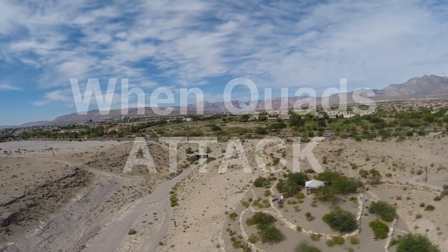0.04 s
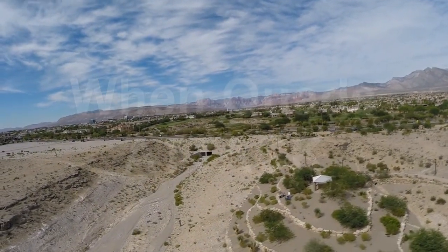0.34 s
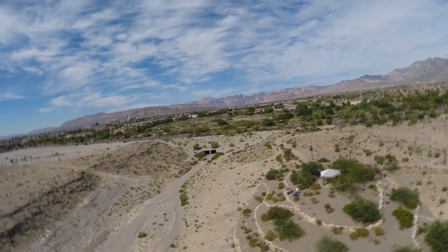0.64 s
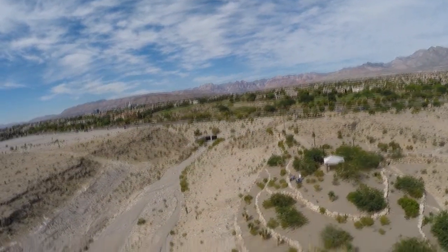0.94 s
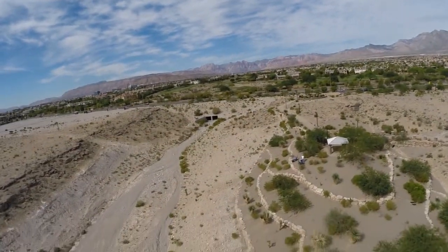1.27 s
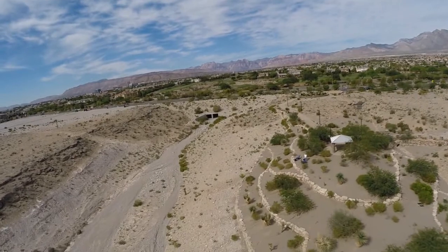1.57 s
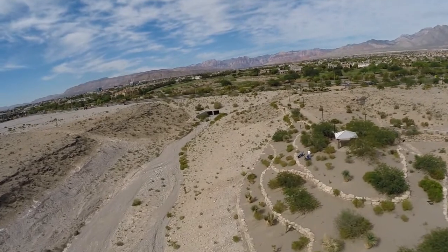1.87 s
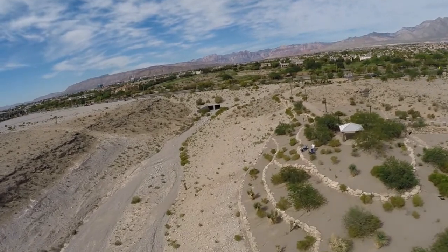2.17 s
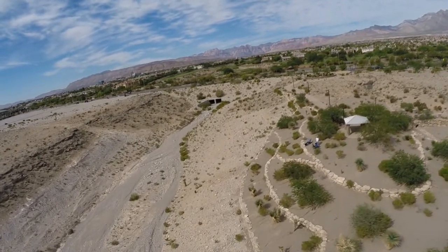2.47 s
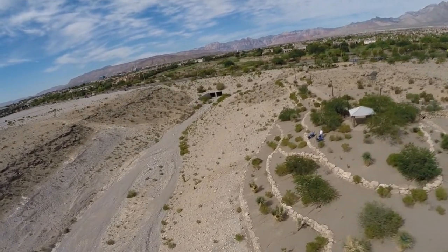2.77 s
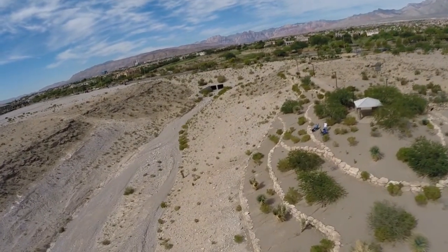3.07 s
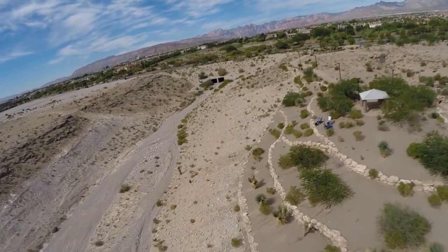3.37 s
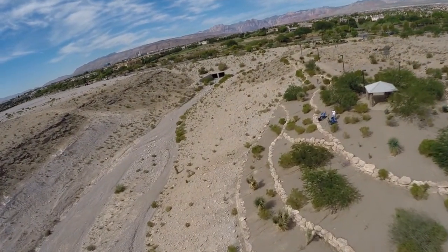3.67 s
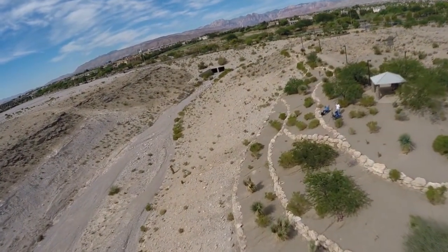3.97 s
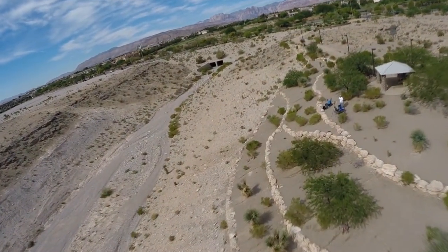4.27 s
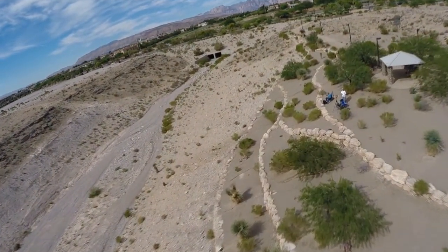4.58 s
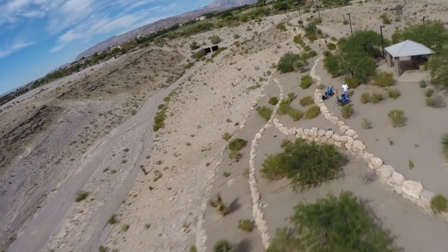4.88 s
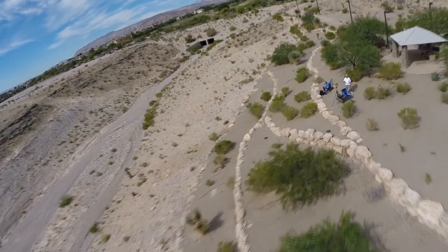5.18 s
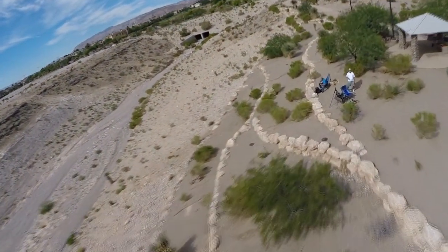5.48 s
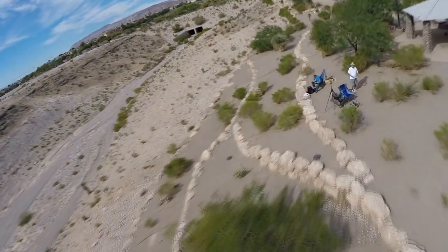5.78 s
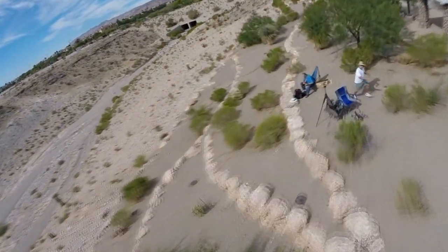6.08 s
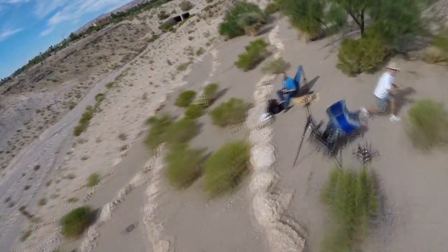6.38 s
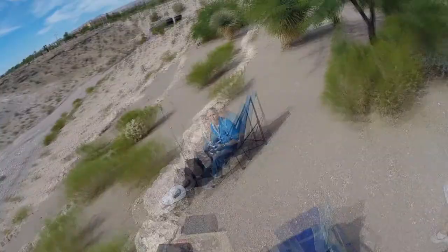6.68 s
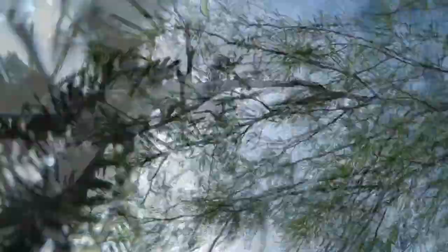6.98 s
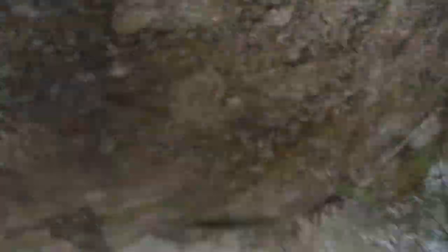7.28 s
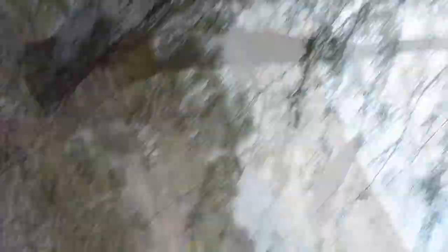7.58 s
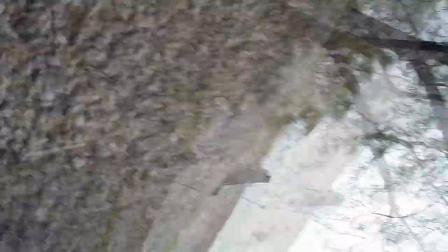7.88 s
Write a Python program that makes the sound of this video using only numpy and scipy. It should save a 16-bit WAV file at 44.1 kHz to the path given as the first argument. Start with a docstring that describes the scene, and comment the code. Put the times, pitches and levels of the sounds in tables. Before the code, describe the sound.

Throbbing propeller buzz and wind on the microphone grow louder, until the quadcopter hits branches, stalls and clatters over gritty ground.

```python
"""A throbbing propeller buzz in gusty wind: a small quadcopter, heard from its own camera, flies low
over a desert wash. It dives, revs up, clips a bush and stalls, then bounces and tumbles on gravel.
Each passing blade sends out a pressure pulse, and rotors at slightly different speeds beat together.
Turbulence adds swish and hiss, the motors whine, and wind buffets the microphone. In the crash,
impacts excite the damped modes of the plastic frame and camera case, and friction rattles the grit."""
import sys
import numpy as np
from scipy import signal
from scipy.fft import rfft, irfft
from scipy.io import wavfile

SR = 44100
rng = np.random.default_rng(int(sys.argv[2]) if len(sys.argv) > 2 else 0)


def unload_wav(signal):
    """Save mono or channel-first audio to the path in sys.argv[1] as 16-bit WAV at rate SR, clipped to [-1, 1]."""
    wavfile.write(
        sys.argv[1],
        SR,
        np.round(np.clip(np.atleast_2d(signal).T, -1, 1) * 32767).astype(np.int16),
    )


N = 350154
TIME = np.arange(N) / SR
STRIKE_S, POWER_OFF_S, GROUND_S = 7.015, 7.165, 7.278  # a branch is hit, motors are cut, the frame lands

# Airspeed, from 0 (cruising) to 1 (fastest), rising until the bush stops it: time_s, dive_fraction
AIRSPEED = [(0, 0.11), (2.8, 0.2), (3.6, 0.34), (4.5, 0.44), (5.6, 0.66), (6.75, 0.91), (6.92, 0.87),
            (7.05, 0)]
# Level laws of the close rotors: cruise_db, dive_db, octave_db, strike_db, off_db, ground_db
NEAR_LEVEL = (-17.5, 0.5, 5, -6, -1, -28)
SECOND_LEVEL = (-20.5, 1.5, -0.5, -24, -11, -30)
# Level law of the motor whine: same columns
WHINE_LEVEL = (-59, 6, 11, -9, -23, -20)

def propellers(far_db=-18, shell_hz=1085, shell_width_hz=99, dip_s=6.946):
    """Beating: two close rotors throb at their difference frequency; two far ones wander around them."""
    near_hz, second_hz = rotor_speeds()
    near_db, second_db = level(NEAR_LEVEL, near_hz), level(SECOND_LEVEL, second_hz)
    whine_db = level(WHINE_LEVEL, second_hz)
    dive, = follow(AIRSPEED)
    wobble_db = -38 + 29.5 * dive  # shaft imbalance, relative to the blade tone
    near_cycles, second_cycles = np.cumsum(near_hz) / SR, np.cumsum(second_hz) / SR + .5
    out = rotor(near_cycles, near_db, wobble_db, dull_db=-1)
    out += rotor(second_cycles, second_db, wobble_db, dull_db=3.5)
    shell = signal.iirpeak(shell_hz, shell_hz / shell_width_hz, fs=SR)
    out += gain_of(1) * dive * signal.lfilter(*shell, out)  # the frame resonates as the dive shakes it
    out += whine(second_hz, whine_db) + whine(near_hz, whine_db - 3)
    out += turbulence(near_cycles, second_cycles, near_hz)
    for hz in (near_hz, second_hz):
        far_hz = hz * (1.005 + .018 * drift(2))
        out += rotor(np.cumsum(far_hz) / SR, second_db + far_db, wobble_db, dull_db=-2.5)
        out += whine(far_hz, whine_db - 7)
    return out * gain_of(-12 * swell(dip_s, half_s=0.007))  # a brief dip on entering the bush

# The near rotor in flight: time_s, blade_rate_hz
FLIGHT_RATE = [(0, 194.4), (.5, 200.1), (.74, 199), (.84, 202.5), (.96, 197.1), (1.22, 201.7), (1.5, 198.1),
               (2.0, 196.1), (2.5, 198.5), (3.4, 203.8), (4.3, 206.9), (4.55, 209), (6.1, 209.1),
               (6.56, 211.8)]
# It pulls up, is slowed by twigs, races free, runs down and twitches once more: time_s, blade_rate_hz
CRASH_RATE = [(6.72, 221.6), (6.891, 272.8), (6.925, 261.6), (6.96, 225.4), (7.056, 198.2), (7.1, 293.4),
              (7.124, 303), (7.25, 201.5), (7.45, 145.5), (7.591, 197), (7.701, 160.4)]
# How far the second rotor's blade rate exceeds the near one's: time_s, beat_hz
BEAT_RATE = [(0, 19.6), (.88, 8.9), (1.0, 13.3), (1.45, 17.1), (1.74, 17.2), (2.87, 12), (3.66, 6.8),
             (4.25, .6), (4.6, 4.4), (4.85, 3.7), (5.03, 6), (5.49, 5.3), (5.68, 8.9), (6.04, 5.4),
             (6.7, 12.6), (6.76, 2), (6.86, 1.5), (6.935, 27), (7.0, 2)]

def rotor_speeds(trim_hz=0.597, stall_decay_s=0.36):
    """Blade-pass frequencies: the second rotor leads until the branch stalls it into exponential decay."""
    trim = trim_hz * drift(4.8)  # nudges from the flight controller
    near_hz = follow(FLIGHT_RATE + CRASH_RATE)[0] + trim
    beat_hz, = follow(BEAT_RATE)
    driven_hz = np.interp(np.minimum(TIME, STRIKE_S), TIME, near_hz + beat_hz)
    return near_hz, driven_hz * np.exp(-np.maximum(TIME - STRIKE_S, 0) / stall_decay_s)

def rotor(cycles, level_db, wobble_db, dull_db, lean_dull_db=3.5):
    """Rotational noise of two blades: their imbalance adds lines at 1 and 3 times the shaft rate."""
    dive, = follow(AIRSPEED)
    jittered = cycles + (0.0047 + 0.0072 * dive) * drift(42)
    upright = blade_pulses(jittered, dull_db)
    leaning = blade_pulses(jittered, dull_db + lean_dull_db)  # the dive turns the blades off axis
    pulses = (1 - dive) * upright + dive * leaning
    shaft = gain_of(wobble_db) * (np.cos(np.pi * cycles) + gain_of(-18) * np.cos(3 * np.pi * cycles))
    flutter_db = (.5 + 0.72 * dive) * drift(37)
    return gain_of(level_db + flutter_db) * (pulses + shaft)

# Spectrum of a passing blade's pressure pulse: harmonic_number, level_db
BLADE_HARMONICS = [(1, 0), (2, -5), (3, -12), (4, -18), (5, -23.5), (6, -27.5), (8, -36), (12, -46),
                   (20, -48)]

def blade_pulses(cycles, dull_db, count=20):
    """Fourier series of one pulse per blade; directivity takes off dull_db per octave."""
    cycle = np.linspace(0, 1, 1024)
    pulse = sum(gain_of(read(BLADE_HARMONICS, k) - dull_db * np.log2(k)) * np.cos(2 * np.pi * k * cycle)
                for k in range(1, count + 1))
    return np.sqrt(2) * np.interp(cycles % 1, cycle, pulse)

def level(law, hz, cruise_hz=205):
    """Level law in dB: linear in airspeed and log rotor speed, falling at each stage of the crash."""
    cruise_db, dive_db, octave_db, strike_db, off_db, ground_db = law
    dive, = follow(AIRSPEED)
    crash_db = strike_db * after(STRIKE_S, ramp_s=0.016)
    crash_db += off_db * after(POWER_OFF_S, ramp_s=0.022)
    crash_db += ground_db * after(GROUND_S, ramp_s=0.074)
    return cruise_db + dive_db * dive + octave_db * np.log2(hz / cruise_hz) + crash_db

# Spectra of the blades' turbulent noise: frequency_hz, relative_density_db
SWISH_SPECTRUM = [(150, -17), (260, -5), (500, -2.5), (800, 0), (950, -1.5), (1070, 4.5), (1220, -9),
                  (1800, -8.5), (2800, -13.5), (5000, -31), (9000, -33)]
HISS_SPECTRUM = [(1200, -0.5), (2800, -3.5), (4300, 2), (5500, -2), (6200, 0.5), (7000, -5), (9000, -9.5),
                 (11000, -11.5), (13300, -9.5), (15300, -23), (16000, -30)]
# Their level laws: cruise_db, dive_db, octave_db, strike_db, off_db, ground_db
SWISH_LEVEL = (-34, 1.5, 6, -15, -7, -25)
HISS_LEVEL = (-41.5, 2.5, 9, -0.5, -17, -25)

def turbulence(near_cycles, second_cycles, hz):
    """Noise modulated at the blade rate: broad puffs of swish, short spits of hiss that rasp with speed."""
    dive, = follow(AIRSPEED)
    gust_db = sum(db * swell(s, half_s) for s, half_s, _, db in AIR_GUSTS)
    swish_gate = .5 + puffs(near_cycles, sharpness=2.1) + .5 * puffs(second_cycles, sharpness=0.81)
    spits = puffs(second_cycles, sharpness=11, uneven_db=1.5) + 0.11 * puffs(near_cycles, sharpness=14)
    hiss_gate = 1 + (0.93 + 4.8 * dive) * spits
    swish = coloured(swish_gate * rng.standard_normal(N), SWISH_SPECTRUM)
    swish *= gain_of(level(SWISH_LEVEL, hz) + gust_db + 0.51 * drift(20))
    hiss = coloured(hiss_gate * rng.standard_normal(N), HISS_SPECTRUM)
    hiss *= gain_of(level(HISS_LEVEL, hz) + 0.55 * drift(23))
    return swish + hiss

def puffs(cycles, sharpness, uneven_db=4.0):
    """Envelope of the turbulent wake behind each blade, no two equally strong."""
    return np.exp(sharpness * (np.cos(2 * np.pi * cycles) - 1)) * gain_of(uneven_db * drift(115))

# How the arms transmit motor vibration: frequency_hz, gain_db
ARM_RESPONSE = [(4500, -12), (5900, -3), (6100, 1), (6300, 10), (6550, 8), (7000, -10), (8400, -4),
                (9000, 0), (9300, -7), (12000, -18)]

def whine(hz, level_db, orders=(28, 42), flutter_db=2.5):
    """Forced vibration: magnet poles passing the coils sing, and squeal at the resonances of the arm."""
    cycles = np.cumsum(hz) / SR + .002 * drift(90) + .02 * drift(9)
    tones = np.zeros(N)
    for k in orders:
        tone_db = read(ARM_RESPONSE, k * hz) + flutter_db * drift(8.3)
        tones += gain_of(tone_db) * np.cos(2 * np.pi * k * cycles)
    return gain_of(level_db) * tones

# Blows on the frame, stiffer parts ringing higher: start_s, knock_db, crack_db, pitch_ratio
IMPACTS = [(7.0165, -7, -9.5, 1.27), (7.021, -2, -16, 0.97), (7.0197, -5.5, -20, 1.15),
           (7.0229, -6, -15, 1.05), (7.0413, -17, -33, 1.4), (7.2827, -16, -9, 1.3), (7.291, -9, -17, 0.8),
           (7.3063, -5, -12, 1.83), (7.3107, -13, -29, 1.85), (7.314, -15, -29, 1.8),
           (7.349, -17, -34, 0.77), (7.354, -6.5, -17, 1.6), (7.36, -10, -19, 1.2), (7.393, -23, -25, 1),
           (7.4053, -24, -10, 1.5), (7.4185, -25, -16, 1.1), (7.457, -13, -35, 1.09),
           (7.559, -40, -29, 1.2), (7.7377, -3, -20, 1.02), (7.749, -8, -20, 1.01), (7.756, -14, -38, 1.24),
           (7.765, -19, -37, 1.2), (7.781, -2, -17, 1.08), (7.8186, -11, -18, 2.53),
           (7.837, -18.5, -29, 0.87), (7.866, -15.5, -18, 2.5), (7.9148, -21, -6.5, 1.7),
           (7.92, -4, -6, 1.26), (7.9248, -5.5, -19, .95), (7.935, -17, -11, 1.4)]
# Modes of the frame and camera case at pitch ratio 1: pitch_hz, relative_level_db, t60_s
FRAME_MODES = [(974, 0.5, 0.014), (1473, -2.5, 0.015), (1720, 4, 0.0062), (2250, -0.5, 0.0066),
               (2760, -9.5, 0.018), (3320, -8.5, 0.013), (4600, -12, 0.015), (5530, -12, 0.021),
               (6100, -16, 0.024), (7200, -17, .014), (9050, -26, .014)]

def knocks(crack_t60_s=0.012, hardness=0.29, contact_s=0.00016, stiffness_db=11):
    """Modal ringing: each blow cracks and rings the frame; harder contacts favour the higher modes."""
    out, t = np.zeros(N), np.arange(SR // 10) / SR
    hz, db, t60 = np.transpose(FRAME_MODES)[:, :, None]
    treble = signal.butter(2, 2800, "high", fs=SR, output="sos")
    for s, knock_db, crack_db, pitch in IMPACTS:
        scatter_db, detune, phase = rng.standard_normal((3, len(FRAME_MODES), 1))
        tilt_db = hardness * (crack_db - knock_db + 7.5) * np.log2(hz / hz[0])
        tilt_db -= stiffness_db * np.log2(pitch) * abs(np.log2(hz / hz[1]))  # stiff parts favour one note
        modes = np.sin(2 * np.pi * (hz * pitch * (1 + 0.0051 * detune) * t + phase))
        decay_db = 60 * t * np.sqrt(pitch) / t60
        ring = (gain_of(db + tilt_db + scatter_db - decay_db) * modes).sum(0)
        ring *= 1 - np.exp(-t / contact_s)  # the plastic yields before it rings
        crack = signal.sosfilt(treble, rng.standard_normal(len(t))) * gain_of(-60 * t / crack_t60_s)
        add(out, s, gain_of(knock_db) * ring / abs(ring).max() + gain_of(crack_db - 3.5) * crack)
    return out

# Dull thumps of the whole body: start_s, level_db, pitch_hz
BODY_JOLTS = [(7.096, -8.5, 39.8), (7.159, -11, 130), (7.293, -9, 56), (7.306, -12, 72.7),
              (7.348, -12.5, 110), (7.455, -15.5, 71.5), (7.534, -16, 65.8), (7.692, -11, 170),
              (7.713, -6.5, 131), (7.727, -8, 150), (7.753, -9, 110), (7.805, -6, 121), (7.83, -9.5, 131),
              (7.874, -10.5, 65.2), (7.92, -11, 140)]

def jolts(decay_per_cycle=1.7):
    """Heavily damped oscillation: the jolted body swings for only a cycle or two."""
    out, t = np.zeros(N), np.arange(SR // 8) / SR
    for s, db, hz in BODY_JOLTS:
        add(out, s, gain_of(db) * np.sin(2 * np.pi * hz * t) * np.exp(-decay_per_cycle * hz * t))
    return out

# Skids through twigs and gravel: start_s, length_s, grit_db, rub_db
SLIDES = [(6.962, 0.06, -33, -19), (7.005, .012, -20, -25), (7.02, 0.017, -20, -29), (7.06, 0.17, -47, -42),
          (7.279, 0.064, -24.5, -33), (7.346, 0.036, -29, -30), (7.387, 0.031, -32, -39),
          (7.447, 0.038, -42, -35), (7.5, 0.074, -57, -38), (7.557, 0.06, -52, -54),
          (7.698, 0.036, -59, -20), (7.717, 0.057, -22.5, -19), (7.776, 0.048, -20.5, -26),
          (7.827, 0.03, -32, -30), (7.868, 0.042, -26, -39), (7.914, .06, -22, -22)]
# Spectra of rattling gravel and of the rubbing case: frequency_hz, relative_density_db
GRAVEL_SPECTRUM = [(150, -5), (500, 10), (1000, 3), (1500, 9.5), (2100, -1), (3000, 3), (4500, -4),
                   (8000, -12.5), (14000, -16), (16000, -19)]
RUB_SPECTRUM = [(100, -8), (200, 12), (310, 5.5), (480, 2), (800, -21), (1500, -26), (4000, -59)]

def skids(grains_per_s=8000, spread_db=4.5, fade_db=15):
    """Friction noise: grit and twigs rattle on the rubbing case, dying away as each skid slows."""
    grains = rng.standard_normal(N) * (rng.random(N) < grains_per_s / SR) * grain_sizes(spread_db)
    grit, rubbing = np.zeros((2, N))
    for s, length_s, grit_db, rub_db in SLIDES:
        progress = np.linspace(0, 1, int(length_s * SR))
        pressure = gain_of(1 - fade_db * progress) * signal.windows.tukey(len(progress), .08)
        add(grit, s, gain_of(grit_db) * pressure)
        add(rubbing, s, gain_of(rub_db) * pressure)
    rattle = grit * coloured(grains, GRAVEL_SPECTRUM)
    return rattle + rubbing * coloured(rng.standard_normal(N), RUB_SPECTRUM)

# Gusts, lulls and the swings of the tumble: centre_s, half_width_s, buffeting_db, swish_db
AIR_GUSTS = [(0.347, 1, -3, -1), (1.7, 0.64, 5, -1), (2.277, 0.12, 2, 1.5), (4.236, 0.88, 6, -1.5),
             (4.644, 0.16, 1.5, 1.5), (6.14, 0.17, 1.5, 5), (6.38, 0.051, -11, 2), (6.532, 0.11, 3.5, 0.5),
             (6.86, 0.082, 2.5, -1), (7.076, 0.15, 7, 10.5), (7.299, 0.03, 16.5, 0), (7.486, 0.046, 10, 0),
             (7.749, 0.082, 23.5, 0), (7.934, 0.056, 16, 0)]
# Spectrum of the buffeting: frequency_hz, relative_density_db
WIND_SPECTRUM = [(10, 3), (25, -11), (50, -3), (85, 0), (130, -1.5), (200, -1.5), (300, -5), (500, -11.5),
                 (1200, -19), (5000, -51), (15000, -45)]

def wind(cruise_db=-33.5, dive_db=10.5, ground_db=-15):
    """Turbulent pressure on the microphone: it grows with the dive, swells in gusts, drops on landing."""
    dive, = follow(AIRSPEED)
    gust_db = sum(db * swell(s, half_s) for s, half_s, db, _ in AIR_GUSTS)
    wind_db = cruise_db + dive_db * dive + ground_db * after(GROUND_S, ramp_s=0.06) + gust_db
    return coloured(rng.standard_normal(N), WIND_SPECTRUM) * gain_of(wind_db + 1.67 * drift(10.2))

def click(start_s=1.4233, level_db=-4, decay_s=0.0008):
    """A single sharp click: a sudden step that dies away quickly."""
    out, t = np.zeros(N), np.arange(SR // 100) / SR
    add(out, start_s, -gain_of(level_db) * np.exp(-t / decay_s))
    return out

# Spectrum of sand ticking on the case: frequency_hz, relative_density_db
SAND_SPECTRUM = [(500, -12), (2500, 0), (7000, -2), (15000, -10)]

def loose_grit(start_s=6.6, per_s=45, level_db=-50, spread_db=3, decay_s=0.0015):
    """Shot noise: thrown sand and small stones tick on the case from just before the crash onward."""
    hits = (rng.random(N) < per_s / SR) * after(start_s, ramp_s=.02) * grain_sizes(spread_db)
    ticks = signal.lfilter([1], [1, -np.exp(-1 / (decay_s * SR))], hits + 1e-12)
    return gain_of(level_db) * ticks * coloured(rng.standard_normal(N), SAND_SPECTRUM)

def grain_sizes(spread_db):
    """Random gains, exponentially distributed in dB and capped: many small, few large."""
    return gain_of(spread_db * np.minimum(rng.exponential(1, N), 3))

def gain_of(db):
    """Decibels as an amplitude ratio."""
    return 10 ** (np.asarray(db) / 20)

def unit_rms(x):
    """Scales to rms 1."""
    return x / np.sqrt(np.mean(x ** 2) + 1e-20)

def follow(rows):
    """Interpolates a curve's columns at every sample."""
    s, *columns = np.transpose(rows)
    return [np.interp(TIME, s, c) for c in columns]

def read(points, at):
    """Interpolates a spectrum along a logarithmic axis."""
    f, value = np.transpose(points)
    return np.interp(np.log(at + 1e-6), np.log(f), value)

def coloured(x, spectrum):
    """Filters x by a spectrum, at rms 1."""
    response = gain_of(read(spectrum, np.fft.rfftfreq(N, 1 / SR)))
    return unit_rms(irfft(rfft(x) * response, N))

def drift(hz):
    """Random fluctuation of rms 1, low-passed at hz."""
    coarse_s = np.arange(0, N, 64) / SR
    lowpass = signal.butter(2, hz, fs=SR / 64, output="sos")
    return np.interp(TIME, coarse_s, unit_rms(signal.sosfilt(lowpass, rng.standard_normal(len(coarse_s)))))

def after(s, ramp_s):
    """A ramp from 0 to 1, starting at time s."""
    return np.clip((TIME - s) / ramp_s, 0, 1)

def swell(s, half_s):
    """A Gaussian hump of height 1 around time s."""
    return np.exp(-((TIME - s) / half_s) ** 2)

def add(mix, s, sound):
    """Mixes a sound in at time s."""
    part = mix[round(s * SR):][:len(sound)]
    part += sound[:len(part)]

def scene(floor_db=-63):
    """Superposition of the flight, the crash and the camera's faint steady hiss."""
    floor = gain_of(floor_db) * rng.standard_normal(N)
    return (propellers() + wind() + knocks() + jolts() + skids() + loose_grit() + click() + floor)[None]

def record(dry, ceiling=.92, cutoff_hz=15500):
    """Soft saturation and low-pass filtering: the camera rounds off peaks and limits the band."""
    limited = dry / (1 + (dry / ceiling) ** 8) ** (1 / 8)
    lowpass = signal.firwin(255, cutoff_hz, window=("kaiser", 9), fs=SR)
    return signal.oaconvolve(limited, lowpass[None], "same")

dry = scene()
out = record(dry)
unload_wav(out)
```